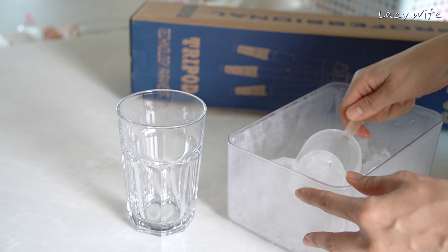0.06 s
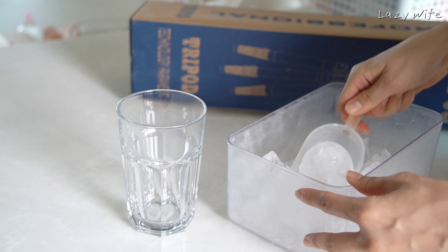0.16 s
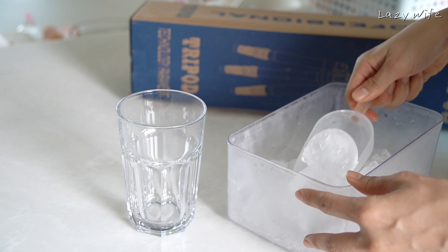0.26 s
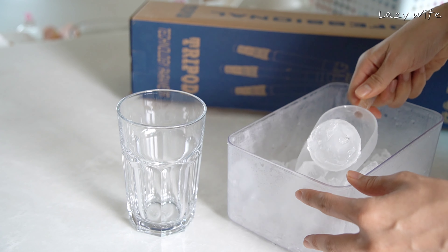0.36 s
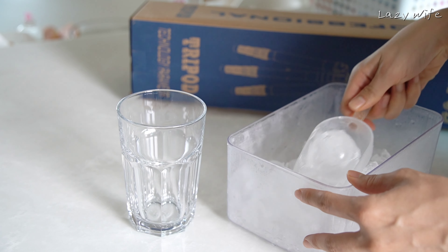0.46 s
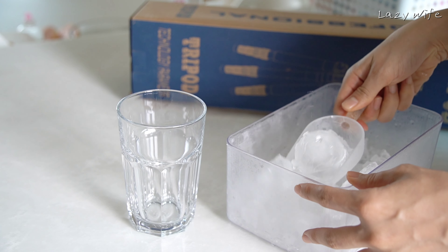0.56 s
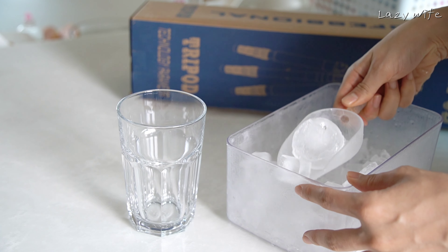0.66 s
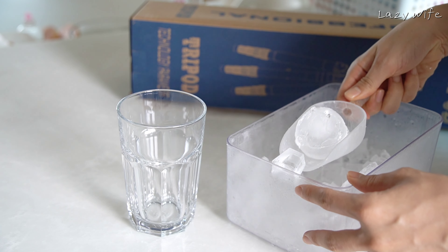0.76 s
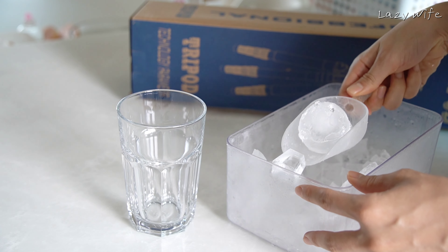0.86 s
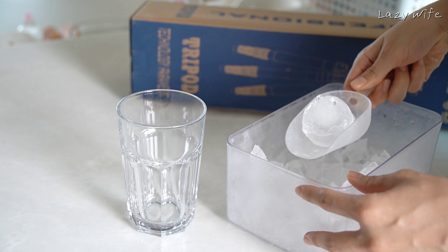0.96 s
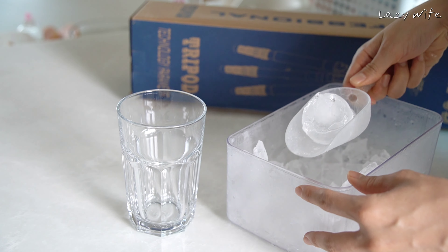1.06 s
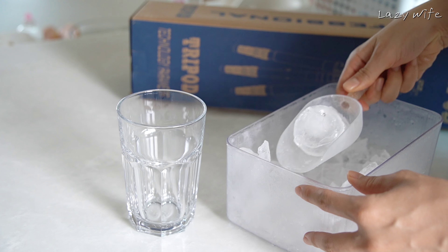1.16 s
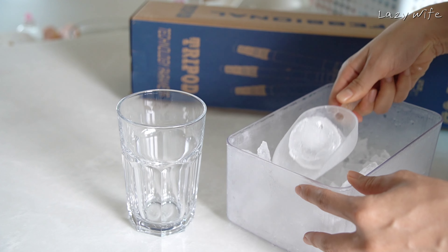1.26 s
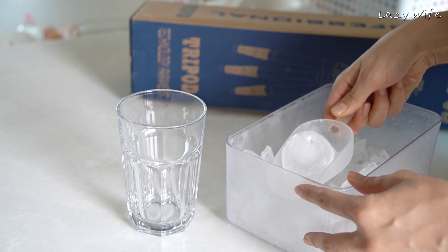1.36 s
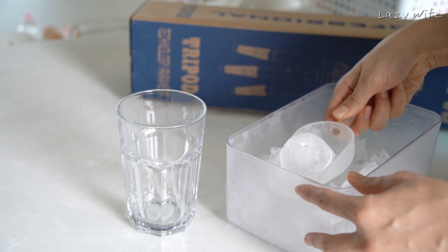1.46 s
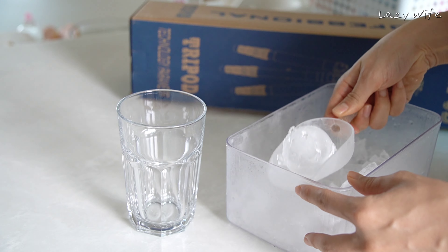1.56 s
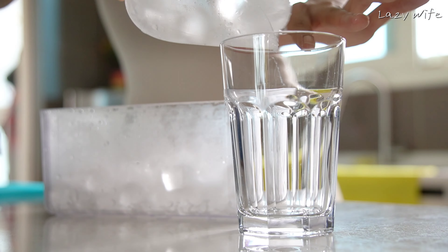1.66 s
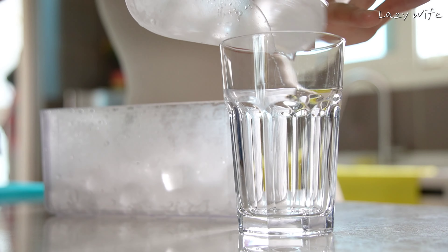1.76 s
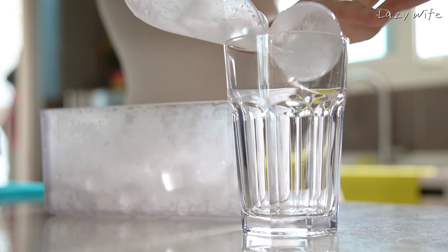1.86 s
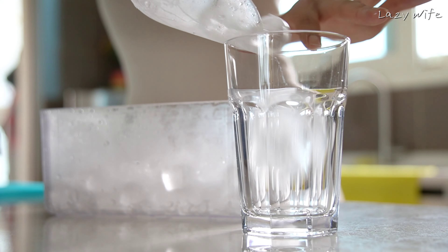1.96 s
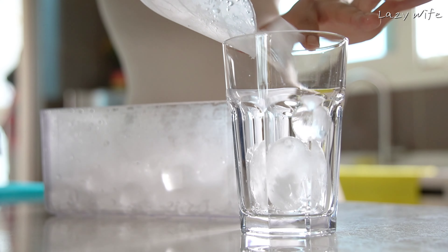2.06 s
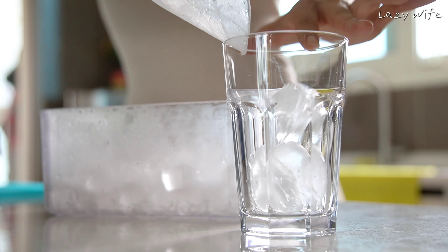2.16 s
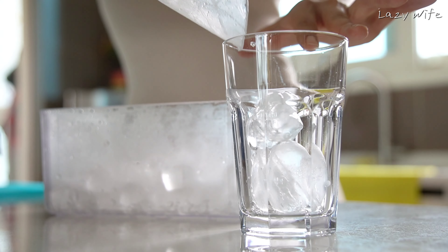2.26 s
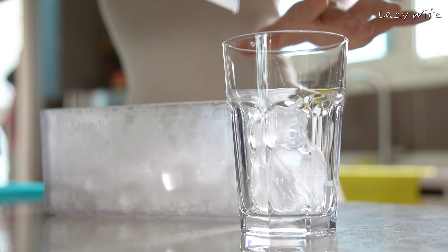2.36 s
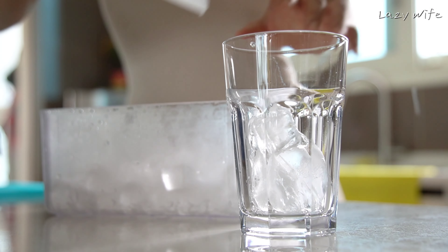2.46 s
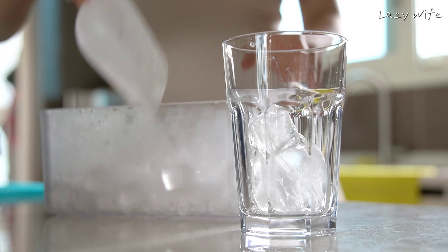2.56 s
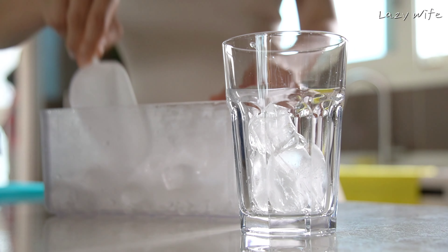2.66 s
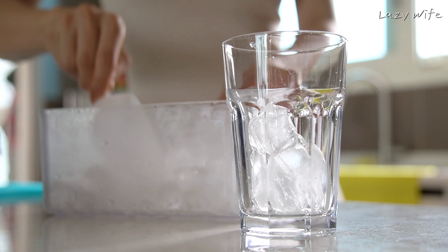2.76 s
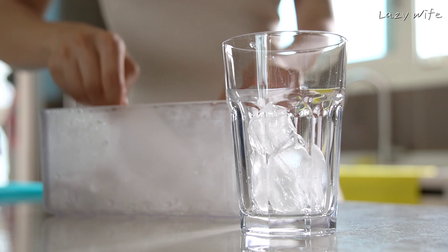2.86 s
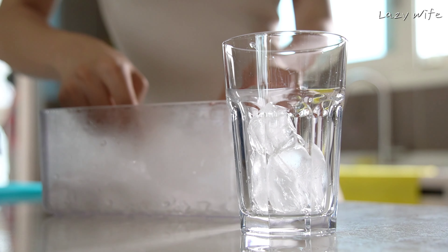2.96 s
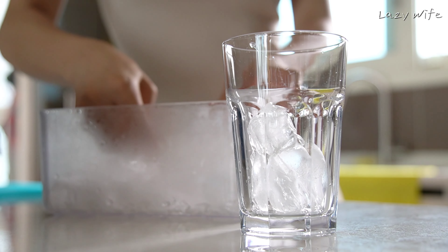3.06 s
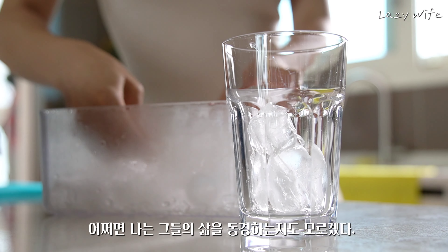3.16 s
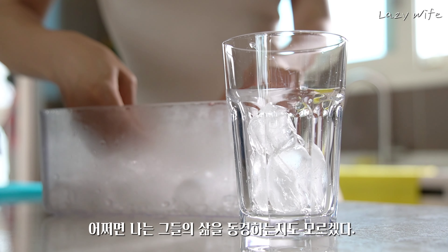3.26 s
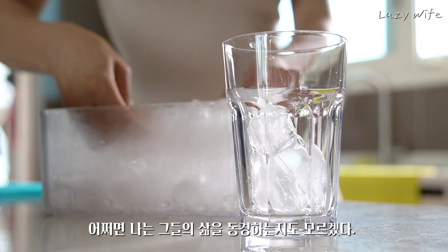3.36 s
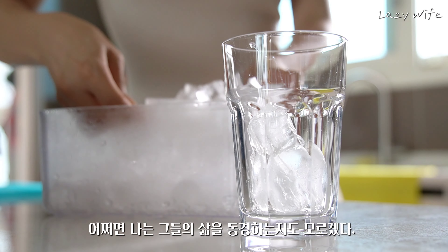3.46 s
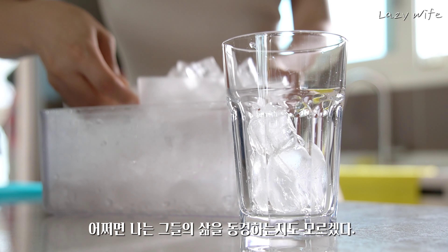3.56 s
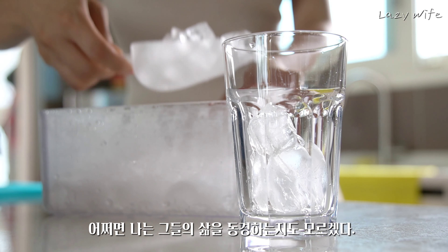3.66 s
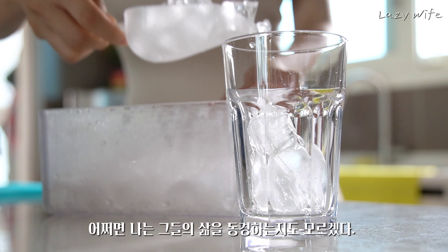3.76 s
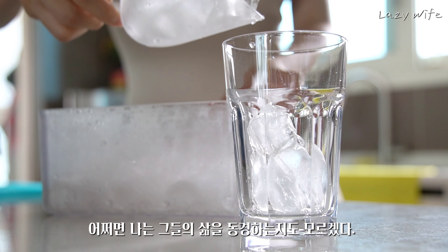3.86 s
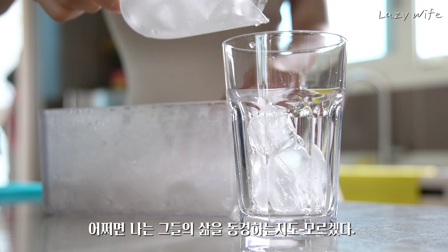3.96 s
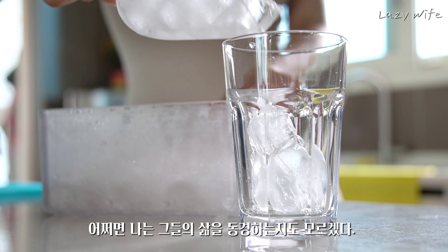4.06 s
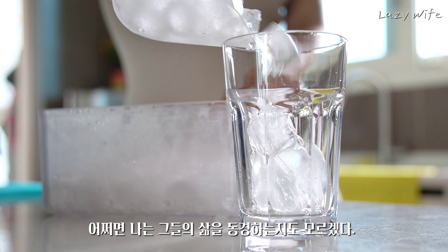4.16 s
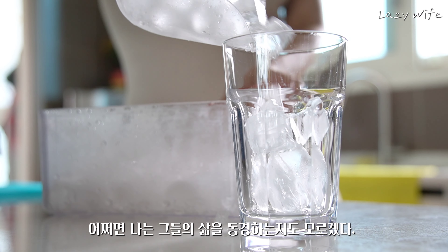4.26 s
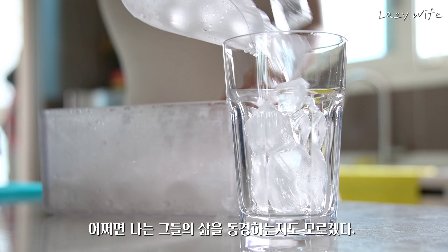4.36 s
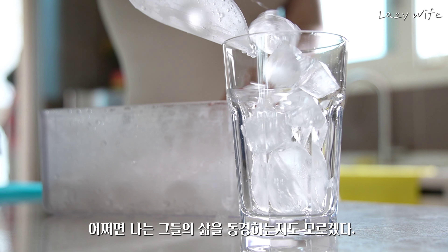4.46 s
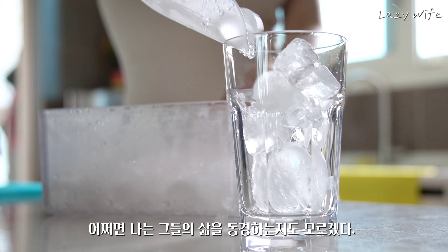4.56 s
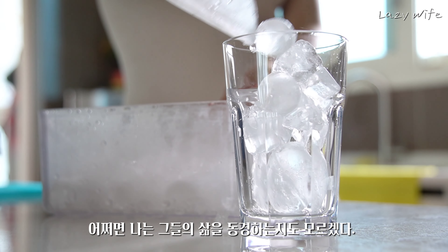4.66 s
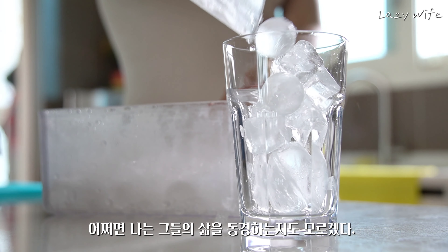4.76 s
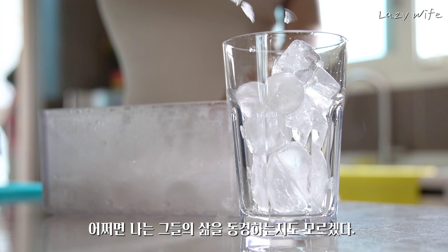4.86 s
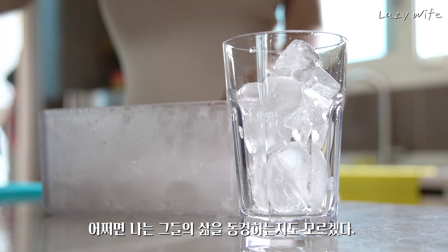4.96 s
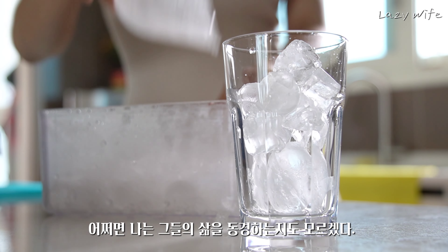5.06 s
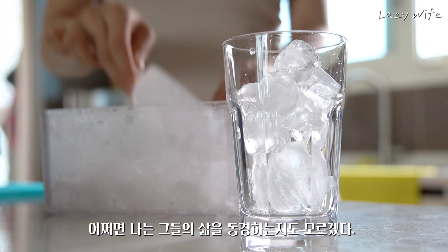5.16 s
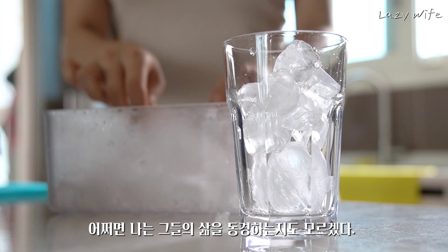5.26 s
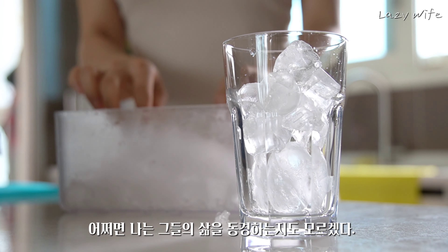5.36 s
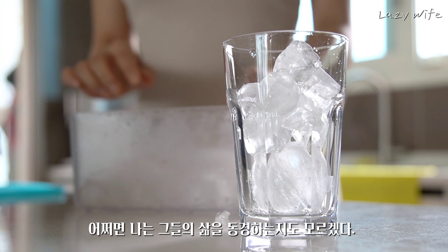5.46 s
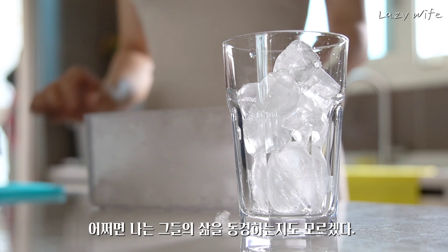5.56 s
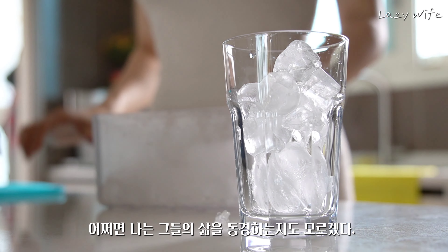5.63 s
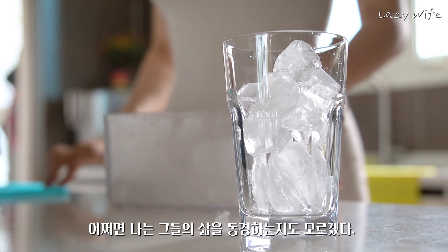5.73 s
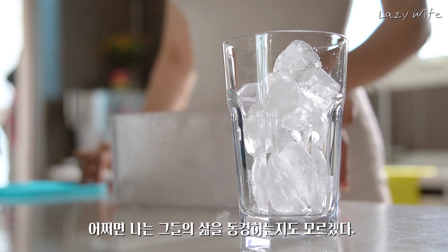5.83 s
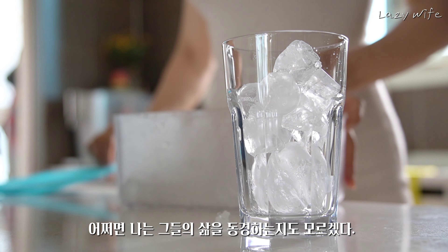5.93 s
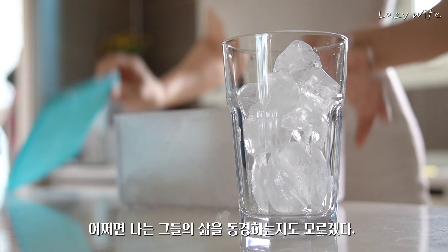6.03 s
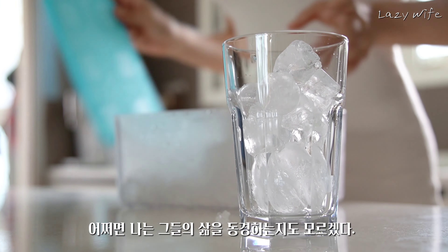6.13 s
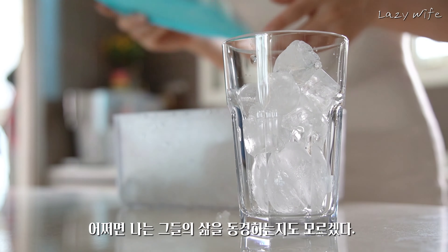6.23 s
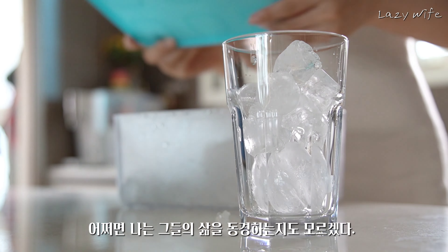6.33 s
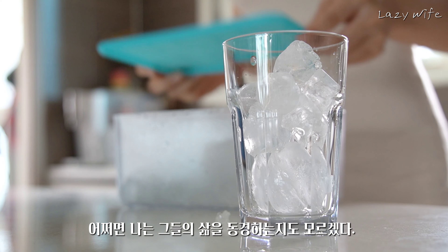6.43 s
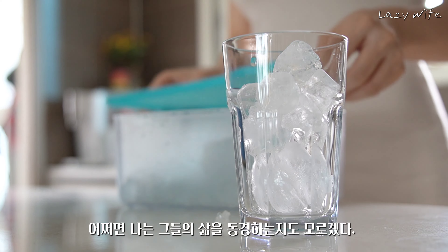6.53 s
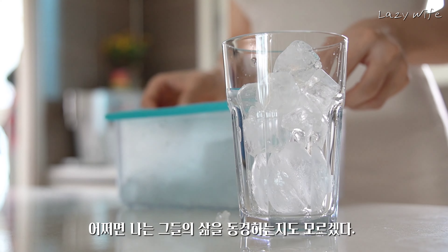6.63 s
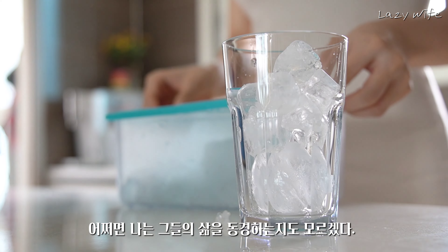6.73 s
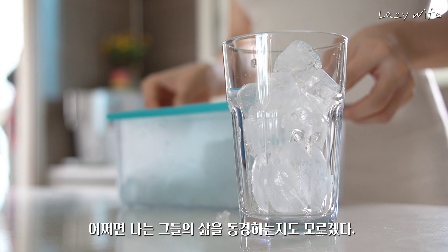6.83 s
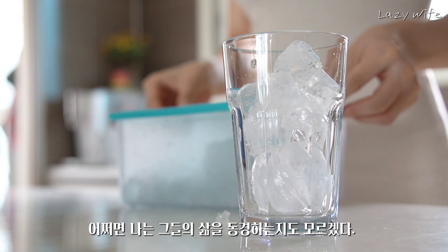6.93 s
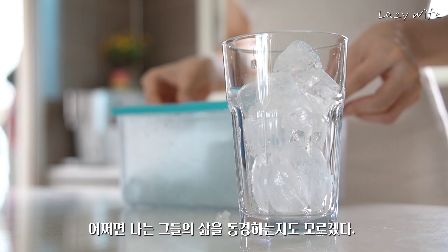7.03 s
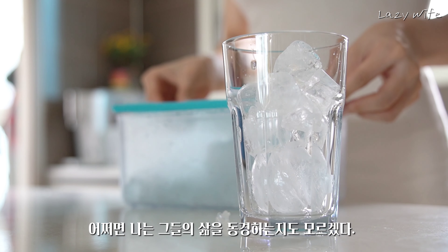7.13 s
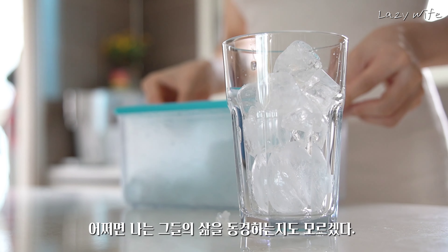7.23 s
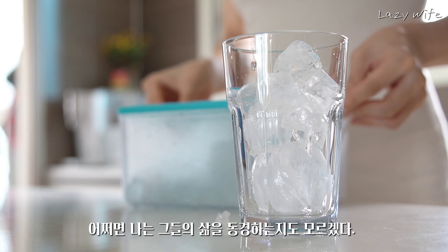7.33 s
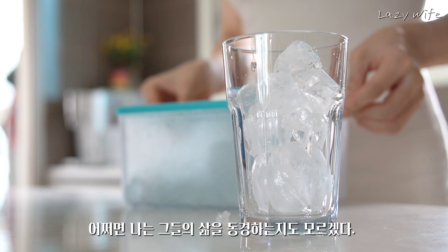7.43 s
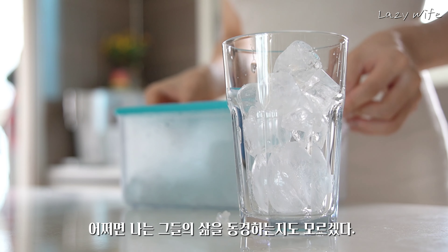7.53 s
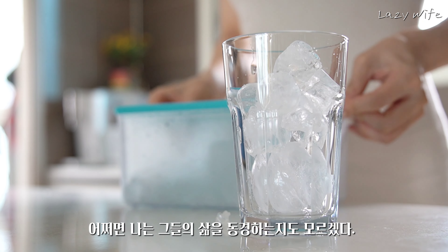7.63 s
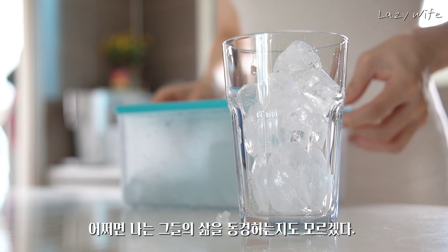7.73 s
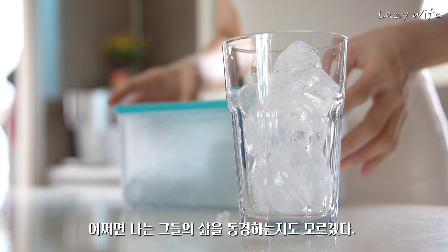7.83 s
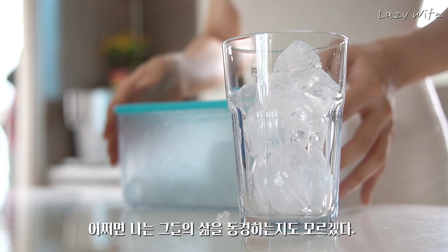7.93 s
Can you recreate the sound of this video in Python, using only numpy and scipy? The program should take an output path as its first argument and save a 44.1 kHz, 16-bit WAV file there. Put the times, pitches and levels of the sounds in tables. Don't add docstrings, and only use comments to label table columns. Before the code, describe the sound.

Close, crisp ice crunching and knocking in a plastic tub, two bright bursts of cubes ringing a glass, then dull lid presses in a kitchen.

```python
import sys
import numpy as np
from scipy import signal
from scipy.fft import rfft, irfft, next_fast_len
from scipy.io import wavfile
from scipy.ndimage import uniform_filter1d

SR = 44100
rng = np.random.default_rng(int(sys.argv[2]) if len(sys.argv) > 2 else 0)


def waveform_to_disk(signal):
    frames = np.transpose(np.atleast_2d(signal))
    scaled = np.clip(frames, -1, 1) * 32767
    samples = np.round(scaled).astype(np.int16)
    wavfile.write(sys.argv[1], SR, samples)


def gain_from_db(level_db):
    decades = np.asarray(level_db, float) / 20
    return 10 ** decades


N = 352359


def evened(x):
    return x / np.sqrt(np.mean(x ** 2) + 1e-20)


def peaked(x):
    return x / abs(x).max()


def read(points, hz):
    f, value = np.transpose(points)
    return np.interp(np.log(hz + 1), np.log(f + 1), value)


def curves(rows):
    s, *columns = np.transpose(rows)
    return [np.interp(np.arange(N) / SR, s, c) for c in columns]


def add(mix, s, sound):
    part = mix[..., round(s * SR):][..., :sound.shape[-1]]
    part += sound[..., :part.shape[-1]]


def colour(points, size=1024):
    gain_db = np.maximum(read(points, abs(np.fft.fftfreq(4 * size, 1 / SR))), -100)
    log_gain = np.log(gain_from_db(gain_db))
    taps = np.fft.ifft(np.exp(np.conj(signal.hilbert(log_gain)))).real[:size]
    return taps / np.linalg.norm(taps)


def ring(modes, t, phase=0):
    out = 0
    for k, (hz, db, t60) in enumerate(modes):
        out = out + gain_from_db(db - 60 * t / max(t60, .004)) * np.sin(2 * np.pi * hz * t + phase * k)
    return out


def above(x, hz):
    return signal.lfilter(*signal.butter(2, hz, "high", fs=SR), x)


ONSET_DB_PER_S, SETTLE_LAW = 3500, 1.34


def slides(rows, settles=1):
    t = np.arange(0, N / SR + .01, .002)
    s, db, rel_db, settle_s = np.transpose(rows)[:, :, None]
    rise_db = ONSET_DB_PER_S * np.maximum(s - t, 0)
    fall_db = rise_db + 20 * (np.maximum(t - s, 0) / abs(settle_s)) ** SETTLE_LAW
    body_power = (gain_from_db(db - fall_db) ** 2).sum(0)
    crackle_power = (gain_from_db(db + rel_db - settles * fall_db) ** 2).sum(0)
    return [np.interp(np.arange(N) / SR, t, np.sqrt(p)) for p in (body_power, crackle_power)]


# start in s, body in dB, crackle over body in dB, time to settle by 20 dB in s.
HEAP_SLIPS = [(0.0, -19, -4, .5), (0.26, -23.5, -4.5, 0.1353), (0.41, -22, -5, 0.44),
              (0.56, -19, -4.5, 0.32), (0.66, -23.5, -11.5, 0.42), (1.106, -27.5, -8.5, 0.28),
              (1.287, -30.5, -5.5, 0.14), (1.472, -27.5, -9, 0.2), (1.62, -28, -4.5, 0.15),
              (1.655, -37, -2.5, 0.21), (1.943, -26, -14, 0.21), (2.135, -21, -35, 0.23),
              (2.37, -40.5, -22, 0.34), (2.8, -28, -6, 0.8), (2.9, -24.5, -7.5, 0.58),
              (2.975, -21.5, -5, 0.46), (3.07, -21, -6.5, 0.32), (3.41, -33.5, -2.5, 0.5),
              (3.58, -32.5, -11, 0.6), (3.7, -25.5, -5, 0.14), (3.85, -31, -4.5, 0.17),
              (3.885, -28, -3.5, 0.35), (4.355, -35, -4.5, 0.33), (4.555, -30, 0.5, 0.2916),
              (4.99, -43, 2.5, 0.2818), (5.368, -21, -4.5, 0.22), (5.567, -32.5, -3.5, 0.2482),
              (5.718, -28, -9, 0.3257)]
# start in s, body in dB, crackle over body in dB, settling in s.
GLASS_TUMBLES = [
    (2.14, -23.5, 0, 0.29),
    (4.36, -33.5, 0, 0.52),
]
# frequency in Hz, level in dB, t60 in s.
TUB_MODES = [(724, 5.5, 0.01346), (762, -0.5, 0.05), (1236, -4.5, 0.021), (1437, -5, 0.08),
             (1710, 3, 0.041), (1940, 0.5, 0.0067)]
# frequency in Hz, level in dB, t60 in s.
PACKED_MODES = [(900, -3, .05), (1600, -3, .05), (1703, -1, .05), (2050, -7, .03), (2600, -9, .02)]
# frequency in Hz, density in dB per Hz.
ICE_BODY = [(160, -35.5), (300, -16.5), (450, -4), (720, 1.5), (950, 0), (1700, 3), (2500, -3), (3500, -5),
            (5000, -54.5)]
# frequency in Hz, density in dB per Hz.
ICE_CRACK = [(1410, -10), (2400, 5), (3370, -3.5), (3830, -1), (5290, -4), (7930, -9), (14000, -15),
             (15900, -14)]
REST_DB = -66.5


def rattle():
    hits_per_s, cracks_per_s, kinds = 1500, 1500, 24
    body_gain, crackle_gain = slides(HEAP_SLIPS)
    size = rng.exponential(1, N).clip(0, 3.5)
    chance, kind = rng.random(N), rng.integers(0, kinds, N)
    hits = gain_from_db(2 * size) * (chance < hits_per_s / SR) * rng.choice([-1, 1], N)
    t, cubes = np.arange(1024) / SR, np.zeros(N)
    for k, hz in enumerate(np.geomspace(480, 3300, kinds)):
        cube = ring([(hz, read(ICE_BODY, hz), .022)], t)
        cubes += signal.oaconvolve(hits * (kind == k), cube)[:N]
    walls = signal.oaconvolve(hits, ring(TUB_MODES, np.arange(2048) / SR, 2.43))[:N]
    dull = signal.oaconvolve(hits, colour(ICE_BODY))[:N]
    body = evened(evened(cubes) + gain_from_db(-15) * evened(walls) + gain_from_db(-2) * evened(dull))
    cracks = gain_from_db(3 * size) * (chance < cracks_per_s / SR)
    fizz = signal.oaconvolve(cracks, gain_from_db(-60 * t / .0107))[:N] * rng.standard_normal(N)
    crackle = evened(signal.oaconvolve(fizz, colour(ICE_CRACK))[:N])
    packed = evened(signal.oaconvolve(hits, ring(PACKED_MODES, np.arange(6000) / SR, 4.83))[:N])
    heap = (body_gain + gain_from_db(REST_DB)) * body + crackle_gain * crackle
    return heap + slides(GLASS_TUMBLES)[0] * packed


# time in s, rumble in dB, hiss in dB.
AIR_GAIN = [
    (0.0, -48, -29.5),
    (1.38, -50.5, -66),
    (2.18, -38.5, -36.5),
    (2.58, -52, -56.5),
    (2.85, -43, -56),
    (2.96, -45.5, -55),
    (5.9, -43.5, -46),
    (7.99, -42, -43),
]
# frequency in Hz, density in dB per Hz.
RUMBLE_SPECTRUM = [(12, -35), (20, -6.5), (120, 1.5), (174, -9), (259, 1), (539, -6.5), (771, -9.5),
                   (1670, -21.5), (1800, -79), (2340, -132), (3960, -120)]
# frequency in Hz, density in dB per Hz.
HISS_SPECTRUM = [(600, -14.5), (1500, -0.5), (2100, 3), (2700, -2.5), (3400, 2.5), (5000, 3), (6800, -2),
                 (8500, -11), (11000, -16), (15900, -19)]
# frequency in Hz, side over mid in dB.
SIDE_OVER_MID = [(60, -31), (110, -26.5), (200, -22.5), (380, -18), (700, -8), (1290, -7.5), (2380, -8),
                 (4400, -4.5), (8120, -3), (15000, -2)]
FRIDGE_DB, FRIDGE_HZ, FRIDGE_END_S = -44, 32, 1.76


def air():
    frames, hz = N // 256 + 5, np.fft.rfftfreq(1024, 1 / SR)
    a, b, c, d, patches = rng.standard_normal((frames, 513, 5)).T
    patches = evened(uniform_filter1d(uniform_filter1d(patches, 12, 0), 16, 1))
    side = (c + 1j * d) * gain_from_db(read(SIDE_OVER_MID, hz))[:, None]
    z = np.array([a + 1j * b, side]) * gain_from_db(1.4 * patches)

    def noise(spectrum):
        shaped = z * gain_from_db(read(spectrum, hz))[:, None]
        return evened(signal.istft(shaped, nperseg=1024, noverlap=768)[1][:, :N])

    rumble_db, hiss_db = curves(AIR_GAIN)
    t = np.arange(N) / SR
    hum = gain_from_db(FRIDGE_DB) * np.clip((FRIDGE_END_S - t) * 40, 0, 1) * np.sin(2 * np.pi * FRIDGE_HZ * t)
    rumble, hiss = noise(RUMBLE_SPECTRUM), noise(HISS_SPECTRUM)
    return gain_from_db(rumble_db + 1.5) * rumble + gain_from_db(hiss_db - 2.5) * hiss + hum * [[1], [0]]


# start in s, peak in dB.
BRIGHT_TICKS = [(0.0252, -11), (0.06, -14), (0.136, -20), (0.3194, -17), (3.9118, -25), (6.28, -31), (6.463, -32),
                (6.59, -27.5), (0.4701, -6), (0.633, -8), (1.061, -20), (1.109, -11), (1.1323, -17), (1.185, -23),
                (1.286, -42), (1.3024, -23), (1.506, -15), (1.56, -10.5), (1.6443, -14), (1.665, -12.5),
                (1.7868, -22), (1.8294, -20), (2.0493, -21), (2.9114, -16), (2.9716, -28), (4.6864, -22),
                (4.9044, -23), (4.9586, -20), (5.009, -15)]


def ticks():
    out, sharp = np.zeros(N), colour(ICE_CRACK)[:128]
    fade = gain_from_db(-60 * np.arange(1200) / SR / .0288)
    for (s, db), puff in zip(BRIGHT_TICKS, rng.standard_normal((len(BRIGHT_TICKS), 1200))):
        add(out, s, gain_from_db(db - 2) * peaked(np.convolve(puff * fade, sharp)))
    return above(out, 3200)


def blows(events, modes, crunch, crack, modes_db, crunch_db, crack_t60, chatter_t60):
    t, out = np.arange(4000) / SR, np.zeros(N)
    walls, broad, sharp = ring(modes, t, 2.17), colour(crunch), colour(crack)
    noise = rng.standard_normal((len(events), 2, 2000))
    for (s, db, hz, rel_db, *own_t60), (a, b) in zip(events, noise):
        t60 = own_t60[0] if own_t60 else .036
        first_touch = 6.3 * (t[:2000] == 0)
        chatter = (a * abs(a) + first_touch) * gain_from_db(-60 * t[:2000] / chatter_t60)
        puff = b * gain_from_db(-60 * t[:2000] / crack_t60)
        partials = [(hz, 0, t60), (1.535 * hz, -5, .18 * t60), (2.05 * hz, -8, .074 * t60)]
        own = peaked(signal.fftconvolve(chatter, ring(partials, t)))
        wall = peaked(signal.fftconvolve(chatter, walls))
        add(out, s, gain_from_db(db) * peaked(own + gain_from_db(modes_db) * wall))
        add(out, s, gain_from_db(db + crunch_db) * peaked(signal.fftconvolve(puff, broad)))
        add(out, s, gain_from_db(db + rel_db) * peaked(signal.fftconvolve(puff + chatter, sharp)))
    return out


# start in s, peak in dB, pitch in Hz, crack over body in dB.
CUBE_KNOCKS = [(0.043, -14, 1710, -9), (0.092, -11, 1460, -12.5), (0.165, -14, 2694, -15),
               (0.288, -11, 1543, -10), (0.435, -20, 1430, -18), (0.566, -16, 2080, -20.5),
               (0.6, -31, 1760, -15), (0.648, -8, 1940, -13), (0.73, -15, 1940, -4), (1.135, -29, 2180, 5),
               (2.913, -8.5, 1880, -10.5), (2.971, -16.5, 1834, -2), (2.989, -20, 2090, -15),
               (3.022, -10.5, 1580, -15), (3.047, -12, 1460, -19), (3.095, -15, 1580, -11.5),
               (3.216, -13, 1830, -4), (3.304, -15, 1144, -19.5), (3.343, -19, 1700, -14.5),
               (3.383, -15.5, 1670, -7), (0.148, -11, 1413, 0), (0.264, -12, 1287, -11),
               (1.182, -16, 1540, -26), (1.287, -17.5, 1896, -11), (1.772, -18, 1840, -5),
               (1.887, -17, 1940, 3), (2.138, -19, 2080, -19), (2.161, -16, 2460, -20),
               (2.578, -22.5, 1520, -21), (3.007, -11, 1758, 2), (3.607, -10.5, 1120, -23.5),
               (4.287, -21, 1730, 8.5), (4.353, -13.5, 1630, -1), (4.369, -16, 1450, -13),
               (4.48, -16, 1590, 2), (4.521, -14, 1880, 0), (4.64, -15.5, 1609, -12),
               (4.919, -20, 1580, 4.5), (4.989, -17, 2190, -14.5), (5.375, -14, 1710, -19)]
# start in s, peak in dB, crack over body in dB.
OPEN_KNOCKS = [(0.408, -19, 10), (0.454, -12.5, -1), (0.753, -18.5, 0), (1.057, -17.5, -20),
               (1.11, -23.5, 6), (1.472, -10.5, -25), (1.616, -23.5, -4), (1.643, -22, 4), (1.943, -12, -2),
               (1.979, -7, -10), (2.234, -10.5, -8), (2.799, -10, -3), (3.58, -12, -19.5),
               (3.699, -9.5, -15), (3.879, -12.5, -12), (3.937, -10, -12), (5.366, -6.5, -16),
               (5.385, -21, -17), (5.419, -16.5, 9), (5.566, -4.5, -9.5), (5.579, -14, 5.5),
               (5.809, -8, -8.5)]
# start in s, peak in dB.
MUFFLED_KNOCKS = [(0.566, -15), (0.683, -8.5), (0.872, -19), (1.068, -17), (1.162, -26), (1.304, -24),
                  (1.331, -23), (1.445, -22.5), (1.79, -20), (2.826, -9), (2.859, -12.5), (3.432, -15.5),
                  (3.505, -21), (3.632, -16), (3.758, -24), (3.902, -20), (4.01, -21.5), (5.535, -17),
                  (2.134, -32), (2.775, -19), (2.887, -8.5), (3.079, -8), (3.158, -6.5), (3.41, -13),
                  (3.477, -14.5), (3.519, -11.5), (3.676, -13.5), (3.724, -14), (3.738, -10),
                  (3.782, -13.5), (5.4, -6), (5.716, -13), (5.734, -4), (5.779, -10.5)]
# start in s,
# peak in dB, pitch in Hz, t60 in s.
HOLLOW_KNOCKS = [(0.568, -22, 3380, 0.216), (1.889, -23, 1760, .1), (2.14, -13, 1710, 0.077),
                 (2.156, -8.5, 1650, .08), (2.262, -9.5, 1710, .09), (2.398, -41, 1690, .08),
                 (4.356, -30, 3590, 0.24), (4.372, -21, 1170, 0.114), (4.385, -19.5, 880, 0.07),
                 (4.41, -26, 1510, .08), (4.501, -19, 1606, 0.096), (4.54, -19, 1630, 0.044),
                 (4.655, -22, 1560, 0.059), (4.931, -26, 1630, 0.11), (5.012, -30, 3870, 0.143)]
MUFFLED_CRACK_DB = -27
FULL_HZ, DUG_HZ, DUG_S, RISE_HZ_PER_S = 850, 670, 1.4, 14
PITCH_SPREAD = .1


def knocks():
    tub = [(s, db, MUFFLED_CRACK_DB) for s, db in MUFFLED_KNOCKS] + OPEN_KNOCKS
    spread = 1 + PITCH_SPREAD * (rng.random(len(tub)) - .5)
    events = []
    for (s, db, crack_db), u in zip(tub, spread):
        hz = FULL_HZ if s < DUG_S else DUG_HZ + RISE_HZ_PER_S * (s - DUG_S)
        events.append((s, db, u * hz, crack_db))
    events += CUBE_KNOCKS
    events += [(s, db, hz, MUFFLED_CRACK_DB, t60) for s, db, hz, t60 in HOLLOW_KNOCKS]
    return blows(events, TUB_MODES, ICE_BODY, ICE_CRACK, modes_db=-7, crunch_db=-5,
                 crack_t60=.07, chatter_t60=.015)


def pings(events, cycles, rise_cycles, noisy, crack_db):
    out, noise, sharp = np.zeros(N), rng.standard_normal((len(events), 1000)), colour(ICE_CRACK)
    t = np.arange(5000) / SR
    for (s, db, hz), puff in zip(events, noise):
        partials = [(hz, 0, cycles / hz)]
        if hz < 1000:
            partials.append((3.04 * hz, -7, .5 * cycles / hz))
        tone = ring(partials, t) * (1 - np.exp(-t * hz / rise_cycles))
        kick = noisy * puff * gain_from_db(-60 * t[:1000] / .018) + (t[:1000] == 0)
        add(out, s, gain_from_db(db) * peaked(signal.fftconvolve(kick, tone)))
        add(out, s, gain_from_db(db + crack_db) * peaked(signal.fftconvolve(kick, sharp)))
    return out


# start in s, peak in dB, pitch in Hz.
ICE_CHIPS = [(4.0906, -24.5, 14700), (0.3701, -16, 5300), (0.4085, -12, 5200), (0.901, -22, 3400),
             (1.1054, -20, 3260), (0.1575, -14, 2740), (0.2598, -16, 2630), (0.4354, -16, 2690),
             (0.6886, -13, 2500), (1.286, -25, 3630), (1.4725, -13.5, 973), (1.5629, -18, 3450),
             (1.6644, -19, 3380), (1.8173, -20.5, 3730), (2.1116, -24, 5300), (1.885, -26, 8100),
             (1.938, -13.5, 8000), (4.286, -19, 6230), (5.082, -28.5, 10700), (3.1632, -16, 3630),
             (3.4346, -19.5, 4530), (3.5845, -20, 4760), (3.0004, -15, 4560), (2.9709, -18, 4460),
             (3.85, -23.5, 2800), (3.9384, -16.5, 3870), (4.1778, -24.5, 2930), (4.6864, -25, 12100)]


def chips():
    return pings(ICE_CHIPS, cycles=22, rise_cycles=.1, noisy=.6, crack_db=-1)


FLUTTER_DB, RING_RISE_S = 2.5, .0015


def flutter(size):
    t = np.arange(size) / SR
    drift = uniform_filter1d(uniform_filter1d(rng.standard_normal(size), 250), 250)
    tremble = evened(drift).clip(-2, 1.5)
    return (1 - np.exp(-t / RING_RISE_S)) * gain_from_db(FLUTTER_DB * np.minimum(t / .03, 1) * tremble)


# frequency in Hz, level in dB, t60 in s.
RIM_MODES = [(2352, 0, .2), (4737, 0, .3)]
# frequency in Hz, level in dB, t60 in s.
UPPER_RIM_MODES = [(7770, 1, .22), (7890, 0, .05)]
# frequency in Hz, level in dB, t60 in s.
BASE_MODES = [(6560, 1, .27)]
# start in s, then first rim, second rim, upper rim and base modes in dB.
POUR_1 = [(1.7893, -39.5, -49, -52, -48), (1.84, -32, -55, -57, -60), (1.887, -16.5, -49, -55.5, -56),
          (1.945, -11.5, -24.5, -31, -41), (1.9794, -21, -51, -35, -33), (2.008, -31, -55, -60, -60),
          (2.0649, -11, -29.5, -40, -55), (2.1101, -12, -46, -50.5, -35), (2.1366, -21, -50, -54, -62),
          (2.2054, -17, -35, -59, -29), (2.2545, -8, -30, -42, -22.5), (2.3699, -13.5, -36, -58, -26),
          (2.5035, -31, -74, -73, -51.5), (2.582, -38, -68, -75, -64)]
# start in s, then first rim, second rim, upper rim and base modes in dB.
POUR_2 = [(3.998, -51, -33, -44, -63), (4.2867, -31, -48, -49.5, -53.5), (4.356, -23, -46, -40.5, -51),
          (4.3697, -12.5, -22.5, -44, -21), (4.3982, -14, -39, -54, -39), (4.43, -27, -34, -55, -58.5),
          (4.4796, -16.5, -25.5, -51, -38.5), (4.521, -23.5, -31, -50, -49.5), (4.5556, -7, -19, -41, -25),
          (4.5796, -18, -21, -27.5, -30), (4.604, -24, -31, -50, -48), (4.6504, -15, -37, -48, -33),
          (4.674, -20.5, -38, -55, -55), (4.6887, -27.5, -29.5, -46, -49), (4.7574, -7.5, -23, -36, -43),
          (4.9197, -38, -57, -49.5, -45.5), (4.9894, -11.5, -22.5, -27, -60),
          (5.0158, -30, -34, -49.5, -61), (5.079, -51, -50, -42, -64)]
# time in s, change in dB.
WALL_GRIPS = [(4.374, -2), (4.405, -18), (4.485, -10), (4.528, -8), (4.566, -21), (4.59, -2), (4.664, -19),
              (4.697, -6), (4.762, -15.5), (4.992, -18), (1.894, -8), (1.955, -4), (1.985, -23),
              (2.069, -4), (2.118, -17), (2.144, -5), (2.213, -7), (2.264, -19), (2.432, -12)]
CLINKS = POUR_1 + POUR_2
TWIN_HZ = 25.6
EMPTY_TWIN_DB, HALF_FULL_S = -9, 3
LOADED_SPREAD_PER_S = .004
GRIP_S, CAUGHT_DB = .008, -5.5


def glass():
    t, out = np.arange(12000) / SR, np.zeros(N)
    luck, noise = rng.random((len(CLINKS), 3, 10)), rng.standard_normal((len(CLINKS), 1500))
    sharp, broad = colour(ICE_CRACK), colour(ICE_BODY)
    for (s, low_db, mid_db, upper_db, base_db), (share, tune, spot), puff in zip(CLINKS, luck, noise):
        groups = [(RIM_MODES[:1], low_db), (RIM_MODES[1:], mid_db),
                  (UPPER_RIM_MODES[:1], upper_db), (BASE_MODES, base_db - 1)]
        modes = [(hz, db + level_db, t60) for group, level_db in groups for hz, db, t60 in group]
        for (hz, db, t60), u in zip(UPPER_RIM_MODES[1:], spot):
            modes.append((hz, db + upper_db + 7 * (u - .5), t60))
        modes = [(hz * (1 + .003 * (u - .5)), db, t60) for (hz, db, t60), u in zip(modes, tune)]
        hz, db, t60 = modes[0]
        low_hz = hz * (1 + LOADED_SPREAD_PER_S * s * (spot[-1] - .5))
        modes[0] = (low_hz, db, t60)
        twins = [(hz + TWIN_HZ * (1 + u), db - 2.5 - 5 * u, .7 * t60)
                 for (hz, db, t60), u in zip(modes, share)]
        hz, db, t60 = twins[0]
        twins[0] = (hz, db + EMPTY_TWIN_DB * (s < HALF_FULL_S), t60)

        end_s = s + t[-1]
        grip_db = sum(db * np.clip((t + s - at) / GRIP_S, 0, 1) for at, db in WALL_GRIPS if s < at < end_s)
        landed = sum(np.clip((t + s - row[0]) * 200, 0, 1) for row in CLINKS if s < row[0] < end_s)
        damping = gain_from_db(grip_db) * gain_from_db(CAUGHT_DB * landed)
        low = ring(modes[:1] + twins[:1], t, 2 * np.pi * share[0])
        high = ring(modes[1:] + twins[1:], t, 2 * np.pi * share[1])
        add(out, s, flutter(len(t)) * damping * low)
        add(out, s, flutter(len(t)) * damping ** .65 * high)
        cube = [(.948 * low_hz, low_db - 6.5, .025), (1.08 * low_hz, low_db - 13, .025)]
        add(out, s, ring(cube, t))
        tick = puff * gain_from_db(-60 * t[:1500] / .02)
        add(out, s, gain_from_db(max(upper_db, base_db) + 8) * peaked(np.convolve(tick, sharp)))
        add(out, s, gain_from_db(low_db - 19) * peaked(np.convolve(tick, broad)))
    return out


# start in s, peak in dB, pitch in Hz.
COUNTER_THUDS = [(1.797, -23, 140), (1.886, -14.5, 201), (1.935, -11.5, 210), (1.947, -13, 380),
                 (1.979, -9.5, 306), (1.985, -22, 108), (2.138, -16.5, 364), (2.16, -20, 301),
                 (2.235, -24.5, 223), (3.604, -25, 259), (4.287, -23.5, 285), (4.368, -17, 306),
                 (4.555, -18.5, 274), (4.64, -22, 126), (4.998, -20.5, 241), (6.783, -21.5, 213)]


def thuds():
    return pings(COUNTER_THUDS, cycles=5.05, rise_cycles=.094, noisy=.148, crack_db=-37)


# frequency in Hz, t60 in s.
THIN_PARTIALS = [(9520, .22), (11680, .2), (12390, .14), (14065, .14), (15300, .07)]
# start in s, 9.5 kHz in dB, 11.7 kHz in dB, the three partials above in dB.
HARD_CORNERS = [(1.944, -40, -31, -33), (1.955, -37, -50, -48), (2.065, -51, -51.5, -44),
                (2.11, -36, -46, -32), (2.205, -39.5, -55, -54), (2.2545, -40, -55, -39),
                (2.3694, -47, -66, -47), (4.353, -36, -52, -51), (4.48, -48, -54, -54),
                (4.555, -40, -29, -47), (4.69, -45, -42, -40), (4.7576, -48, -49, -52),
                (4.9877, -45, -37, -50), (5.012, -47, -49, -46)]


def corners():
    t, out, luck = np.arange(10000) / SR, np.zeros(N), rng.random((len(HARD_CORNERS), 2, 5))
    for (s, a_db, b_db, c_db), (tune, spot) in zip(HARD_CORNERS, luck):
        levels_db = [a_db, b_db, c_db, c_db - 2, c_db + 3]
        modes = [(hz * (1 + .001 * (u - .5)), db + 4 * (v - .5), t60)
                 for (hz, t60), db, u, v in zip(THIN_PARTIALS, levels_db, tune, spot)]
        twins = [(hz + 3 * TWIN_HZ, db, .29 * t60) for hz, db, t60 in modes]
        add(out, s, flutter(len(t)) * (ring(modes, t) + ring(twins, t, 1.75)))
    return out


# start in s, peak in dB, pitch in Hz, snap over thump in dB.
LID_THUMPS = [(6.687, -11.5, 535, -1.5), (6.706, -27, 476, 6), (6.716, -12, 440, -7),
              (6.732, -4.5, 460, -9.5), (6.782, -8, 432, -19), (6.79, -11, 433, -11),
              (6.934, -22.5, 480, -6), (6.97, -16, 412, -7), (6.992, -18, 402, -7.5),
              (7.027, -15, 460, -20.5), (7.052, -11, 430, -12), (7.072, -21, 375, -22),
              (7.178, -21, 458, -5), (7.286, -16.5, 397, -22), (7.314, -14.5, 460, -4),
              (7.342, -15, 500, 3), (7.348, -7, 284, -17), (7.405, -19.5, 373, -8.5),
              (7.421, -19, 414, -18), (7.44, -19, 327, -11), (7.451, -28, 400, -24.5),
              (7.496, -36, 298, -25), (7.58, -18, 303, -28.5), (7.609, -18, 276, -32),
              (7.628, -18, 286, -21),  (7.679, -21, 267.6, -3.5), (7.964, -21, 249, -34.5)]
# frequency in Hz, level in dB, t60 in s.
LID_MODES = [(285, -17, 0.08), (390, -8, 0.06), (477, 2.5, 0.04), (950, -15, 0.2), (1390, -16, 0.03)]
# frequency in Hz, density in dB per Hz.
LID_SNAP = [(300, -40), (600, 9.5), (1000, 5.5), (1600, 0.5), (2500, -8), (4000, -15.5), (7000, -28),
            (15800, -42.5)]
THUMP_T60_S, THUMP_HZ, THUMP_LAW = .062, 440, 1.44


def lid_presses():
    events = [(*row, THUMP_T60_S * (THUMP_HZ / row[2]) ** THUMP_LAW) for row in LID_THUMPS]
    return blows(events, LID_MODES, LID_SNAP, LID_SNAP, modes_db=-11.5, crunch_db=-24,
                 crack_t60=.077, chatter_t60=.011)


def tail(x, decays, start):
    taps = np.zeros(SR // 2)
    at = np.arange(start, len(taps) - 20, 20)
    taps[at + rng.integers(0, 20, len(at))] = rng.choice([-1., 1.], len(at))
    hz, t, z = signal.stft(taps, SR, nperseg=128)
    t60 = np.maximum(read(decays, hz), .005)[:, None]
    response = signal.istft(z * gain_from_db(-60 * t / t60), SR, nperseg=128)[1]
    response[:start] = 0
    return signal.fftconvolve(x, response / np.linalg.norm(response))[:N]


def shifting(x, decays, start, per_s, count=4):
    turn = np.pi * per_s * np.arange(N) / SR
    tails = [tail(x * np.cos(turn + k * np.pi / count) ** 2, decays, start) for k in range(count)]
    return sum(tails) / np.sqrt(3 * count / 8)


# frequency in Hz, t60 in s.
KITCHEN_T60 = [(200, 0.52), (700, 0.37), (2000, 0.22), (5000, 0.35), (14000, 0.25)]
ROOM_DB, LID_WET_DB = -5.5, -1


def scene():
    clinks = glass() + corners()
    ice = rattle() + clinks + knocks() + chips() + ticks()
    close = above(above(ice, 253), 253) + above(thuds(), 93.6)
    lid = above(lid_presses(), 232)
    room = shifting(close + gain_from_db(LID_WET_DB) * lid, KITCHEN_T60, 150, per_s=5, count=3)
    mid = close + lid + gain_from_db(ROOM_DB) * room
    scattered = shifting(mid, [(200, .043), (14000, .18)], 1, per_s=18)
    size = next_fast_len(N)
    width = gain_from_db(read(SIDE_OVER_MID, np.fft.rfftfreq(size, 1 / SR)))
    side = irfft(rfft(scattered, size) * width, size)[:N] - .068 * clinks - .032 * mid
    air_mid, air_side = air()
    mid, side = mid + air_mid, side + air_side
    return np.array([mid + side, mid - side])


def top_cut(x):
    return signal.sosfilt(signal.butter(12, 16710, fs=SR, output="sos"), x)


def record(dry):
    soft = 2.5 * np.tanh(dry / 2.5)
    edge = signal.firwin(767, 15800, window=("kaiser", 5), fs=SR)
    mix = signal.oaconvolve(soft, edge[None], "same")
    return top_cut(mix)


dry = scene()
out = record(dry)
waveform_to_disk(out)
```